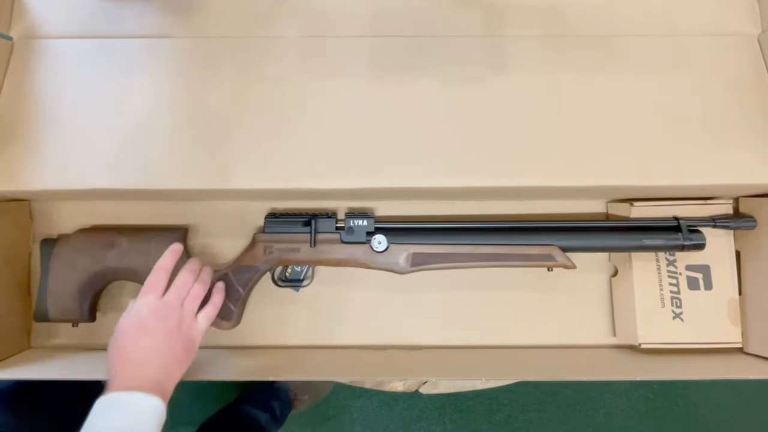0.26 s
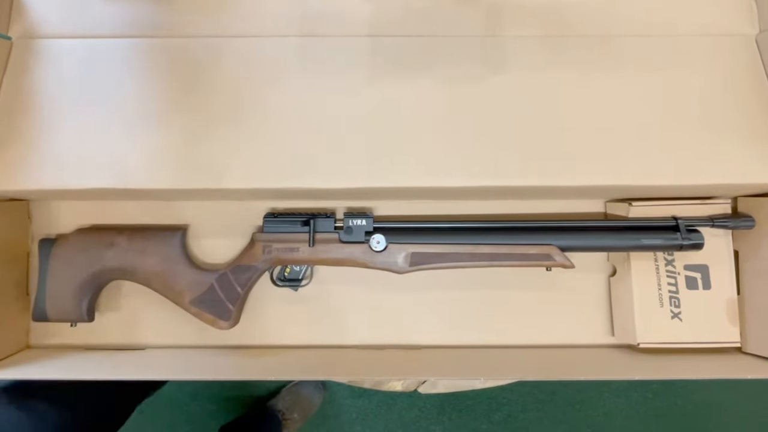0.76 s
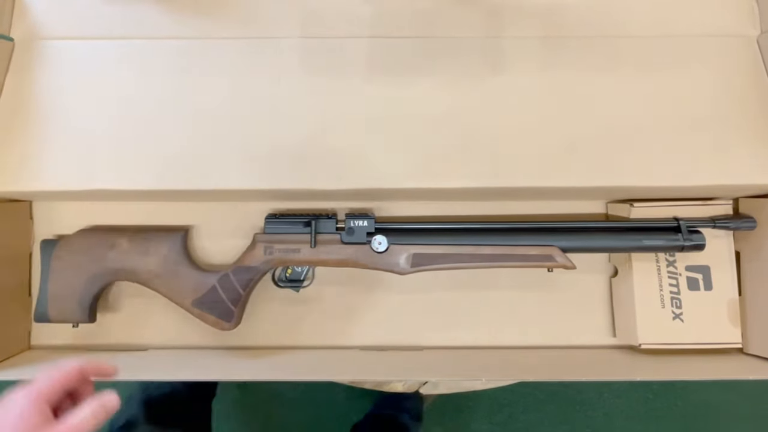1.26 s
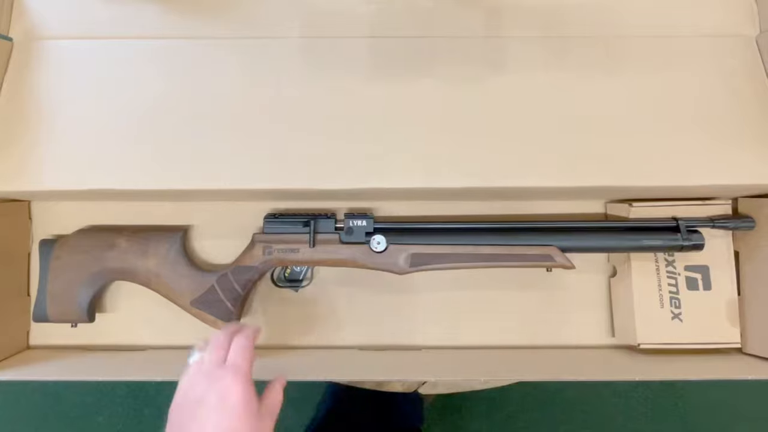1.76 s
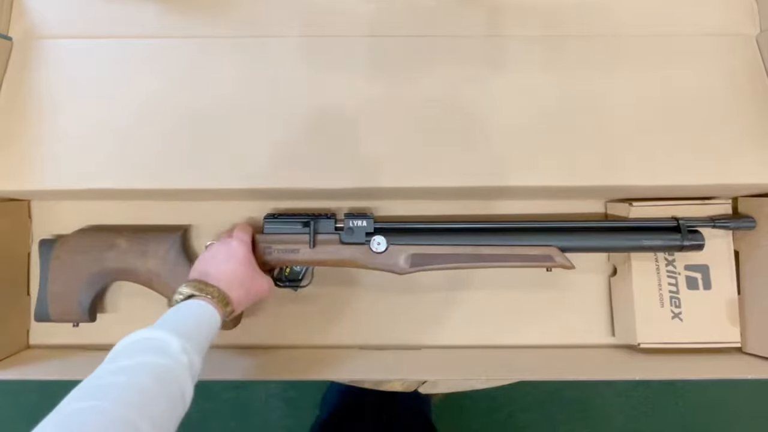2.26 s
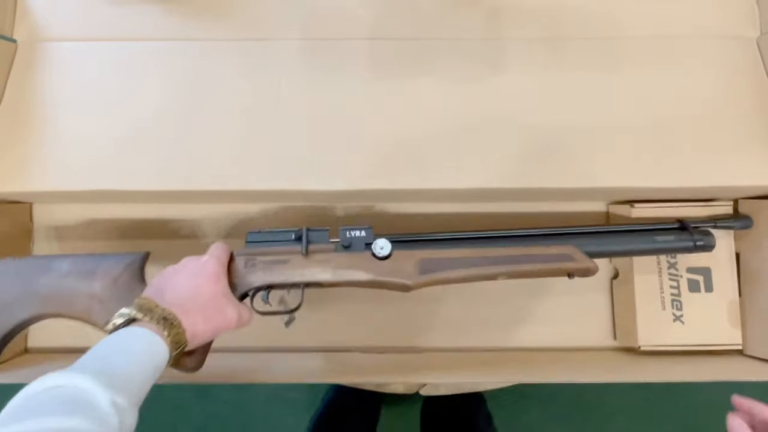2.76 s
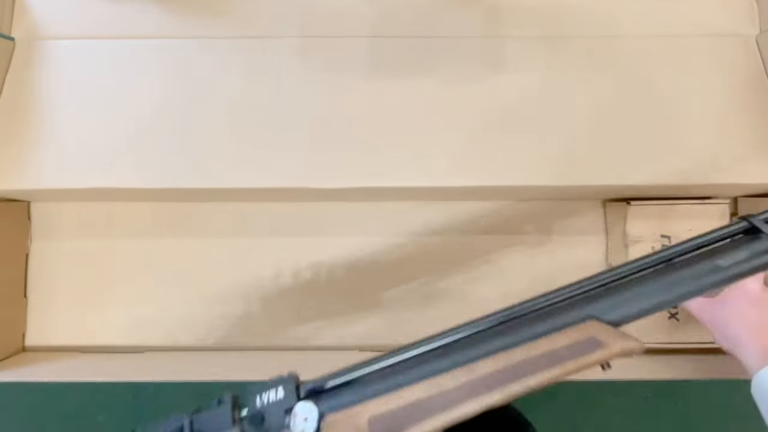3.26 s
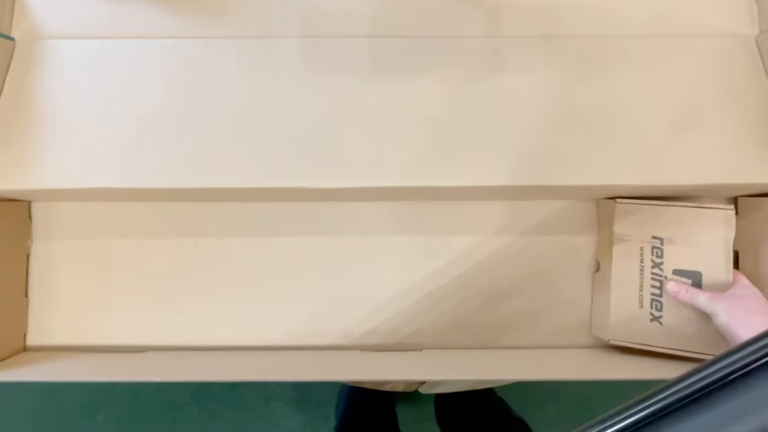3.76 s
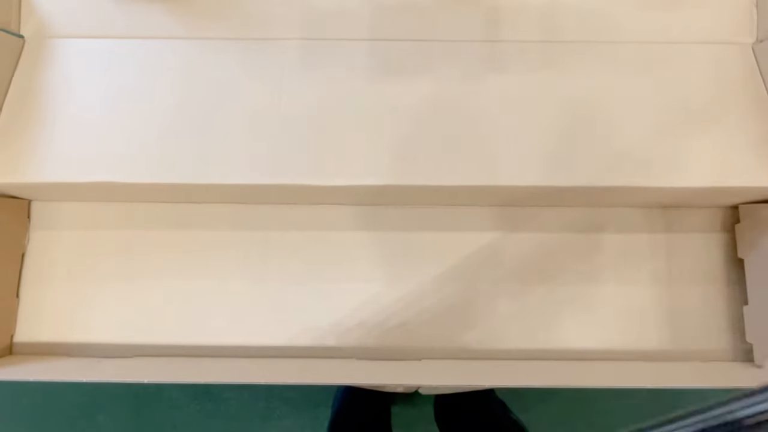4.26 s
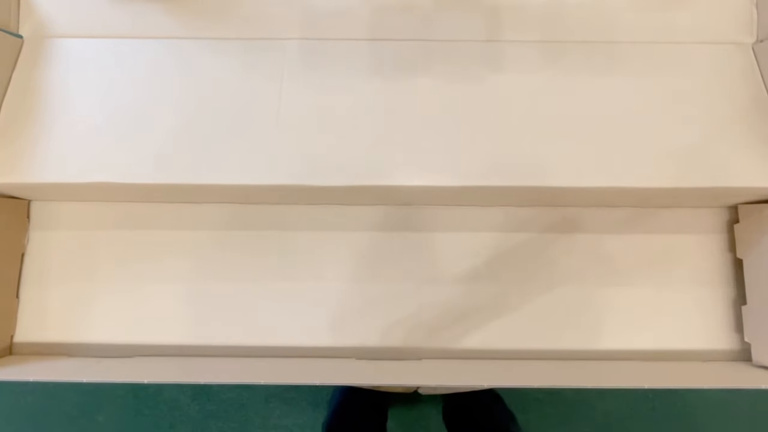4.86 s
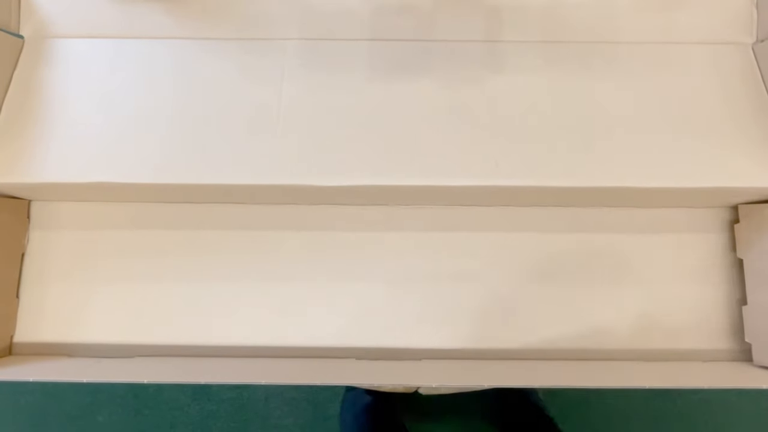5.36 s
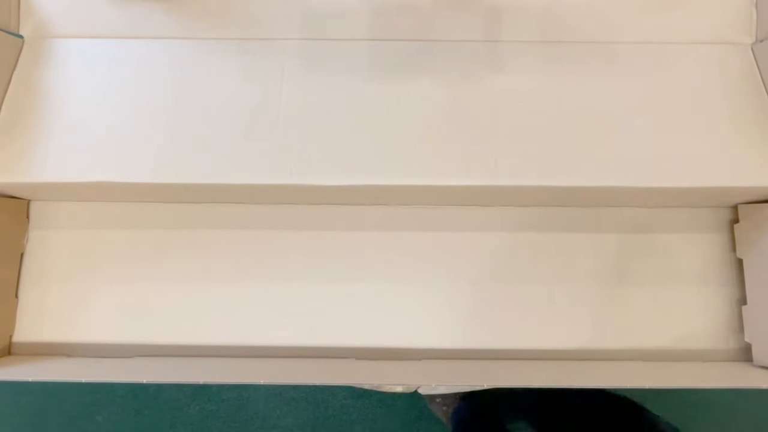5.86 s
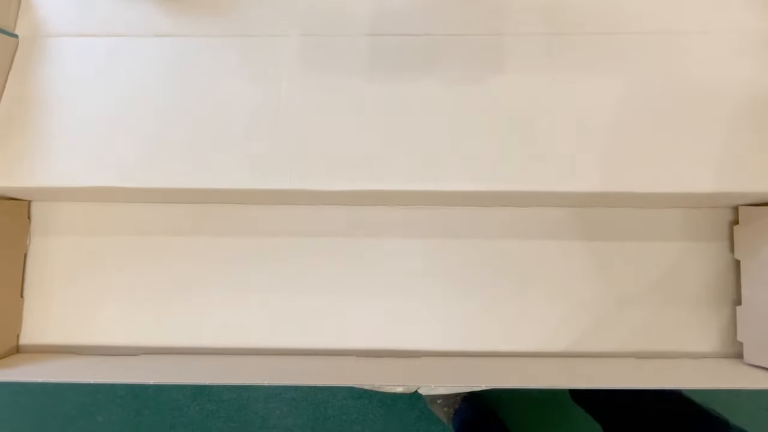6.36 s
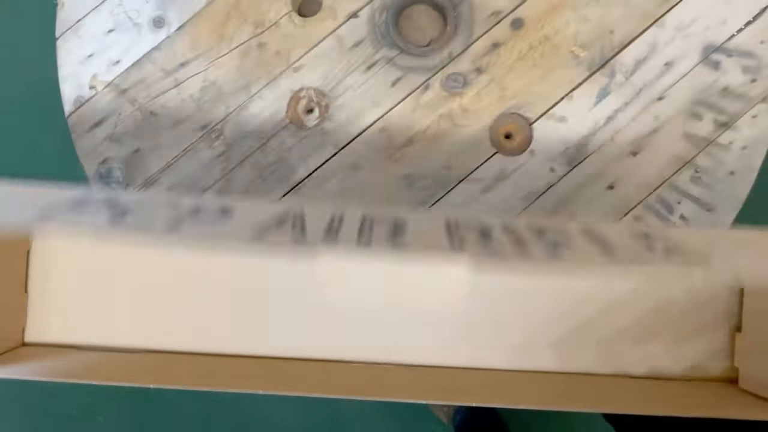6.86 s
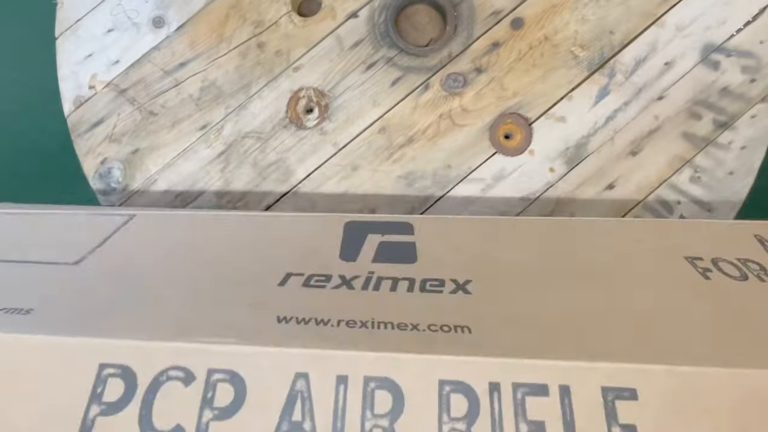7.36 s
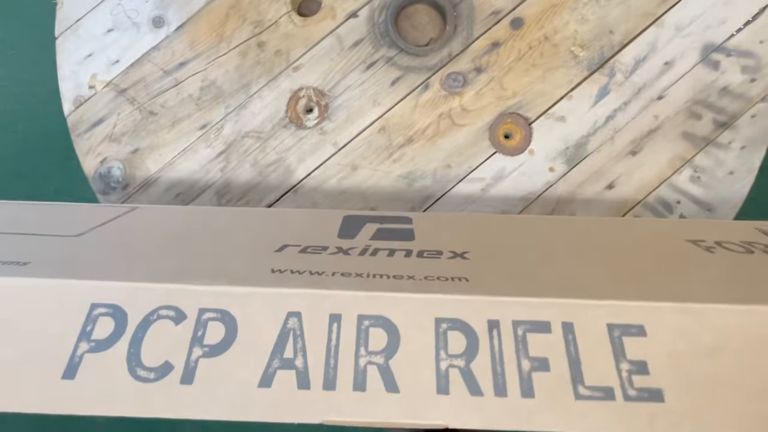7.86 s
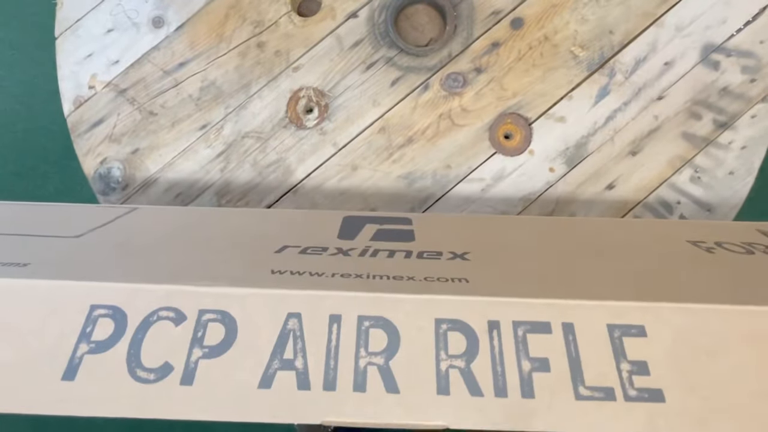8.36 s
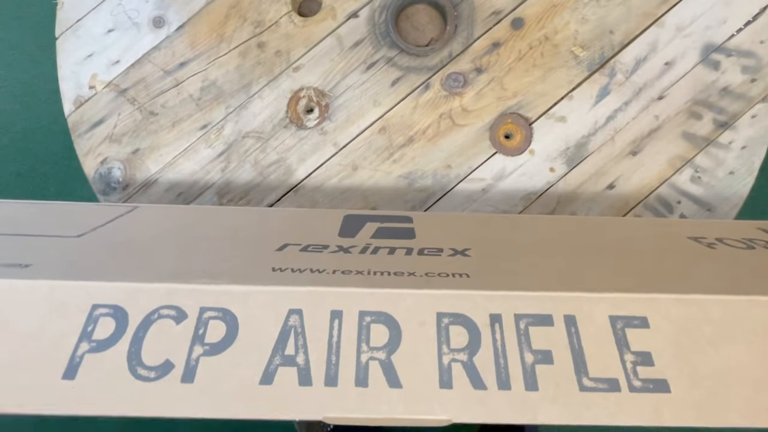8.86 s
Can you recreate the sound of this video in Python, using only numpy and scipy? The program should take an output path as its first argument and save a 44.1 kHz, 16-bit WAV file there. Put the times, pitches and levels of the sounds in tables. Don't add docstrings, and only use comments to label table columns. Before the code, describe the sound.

Hands handle a big cardboard box, heard near and dry with very short room reflections. Skin and edges hiss and scrape over board; blows give dull low-mid thunks and soft hollow booms. An opening scuff fades to quiet, then come lifting bumps, carton rubs with small ticks and a tiny metallic chink, one sharp tap, a pause, and heavy lid closing thumps with papery rustles.

```python
import sys
import numpy as np
from scipy import signal
from scipy.fft import rfft, irfft, next_fast_len
from scipy.io import wavfile
from scipy.ndimage import uniform_filter1d

SR = 44100
rng = np.random.default_rng(int(sys.argv[2]) if len(sys.argv) > 2 else 0)


def volts(x):
    e = np.asarray(x, float) / 20
    return 10 ** e


def file_out(sig):
    cols = np.atleast_2d(sig).T
    lim = np.clip(cols, -1, 1)
    pcm = np.round(lim * 32767).astype(np.int16)
    wavfile.write(sys.argv[1], SR, pcm)


N = 401751

# t/s, pitch of the touched spot f/Hz, left-right balance/dB
HAND_PATH = [(0.2, 377, -1.5), (0.33, 765.7, -3.5), (0.61, 707, -2), (1.09, 336.2, 3.5), (2.66, 365, -1),
             (2.89, 834.4, 0), (3.07, 353, 0), (3.86, 349.5, -1), (4.26, 836.1, 0), (4.69, 620, 1.5),
             (4.9, 338.3, 6.5), (5.07, 695.9, 4.5), (5.9, 437.2, 2.5), (6.5, 371.9, -1), (8.14, 388.2, 1),
             (8.28, 920, 7), (8.45, 293.9, 1), (8.95, 300.8, 1.5)]


def handling():
    # t of the peak/s, scrape level/dB, boom above scrape/dB, swell/s, fade/s per 20 dB
    push_table = [(0.0, -31, 5, .1, 0.0311), (0.12, -44.5, -0.5, 0.218, 0.0658), (0.2, -57, 4, 0.1258, .5),
                  (0.03, -41, -5, 0.0488, 0.0795), (0.512, -51, -14.5, 0.04903, -0.054),
                  (1.4, -75, 6, 0.4318, 0.9932), (2.2, -54.5, 4.5, 0.07575, 0.5976),
                  (2.35, -48.5, 0.5, 0.16435, 0.1797), (2.66, -69, 6, 0.477, -0.5532),
                  (3.3, -59.5, -17, 0.1143, 1.4946), (3.15, -59.5, -5.5, 0.02404, 2.3378),
                  (3.73, -50, 0.5, 0.4205, 0.5247), (4.15, -60, -7, 0.645, 0.4635),
                  (4.87, -65.5, -17, 0.365, 0.34), (5.0, -63, -1, 0.5044, -0.28),
                  (5.12, -53, -11.5, 0.03, 0.7642), (6.0, -65, 1.5, 0.3, 3.5),
                  (6.548, -46, 2, 0.24074, 0.2911), (7.0, -60.5, 18, 0.075, .5),
                  (7.18, -49.5, -12.5, 0.351, 0.3492), (7.609, -47.5, 6, 0.22701, 0.1758),
                  (8.05, -67.5, 8, 0.088, 0.2735), (7.88, -67.5, 7, 0.0511, 0.1204),
                  (7.96, -73, 16, 0.033, 0.0301), (2.02, -74.5, 16, 0.0308, 0.1976),
                  (8.42, -62, 1, .08, -0.0581), (6.8, -57.5, 2.5, 0.069, -0.0127),
                  (5.75, -61.5, -3.5, .1, 0.7061), (7.36, -62.5, 5.5, 0.23, 0.4684),
                  (8.5, -56, -2, 0.2985, 0.2942), (8.85, -47.5, 0.5, 0.04747, -1),
                  (9.0, -48.5, 4.5, 0.19, -1.7814)]
    # t of the peak/s, level/dB, swell/s, fade/s per 20 dB
    lift_rubs = [(0.0, -54.5, 0.035, 0.2904), (0.12, -51, 0.4744, 0.0753), (0.24, -48.5, 0.04188, .5),
                 (0.348, -50.5, 0.242, 0.2537), (0.509, -51.5, 0.0816, 0.2137),
                 (0.66, -64.5, 0.0658, 0.2244), (1.24, -69.5, 0.1059, 0.7204),
                 (2.17, -56.5, 0.0563, 0.2632), (2.328, -51.5, 0.06663, 0.1718),
                 (2.514, -60.5, 0.0217, 0.1324), (2.745, -65, 0.11, 0.06), (2.81, -66, 0.045, 0.17),
                 (3.141, -64.5, 0.01729, 0.5366), (3.29, -52, 0.0605, 0.1492),
                 (3.52, -64.5, 0.3437, 0.5318), (3.4, -64.5, 0.0405, 0.0023), (3.19, -64, 0.0326, -0.3421),
                 (3.627, -53.5, 0.08757, 0.1855), (3.729, -45, 0.04611, 0.1928),
                 (3.877, -48.5, 0.1176, 0.1453), (3.95, -62.5, 0.0232, 1), (4.045, -55, 0.1, 0.11)]
    carton_rubs = [(4.14, -55, 0.0864, 0.2284), (4.299, -51, 0.07934, 0.1433),
                   (4.492, -53.5, 0.02726, 0.0778), (4.669, -56, 0.07004, 0.02155),
                   (4.799, -52.5, 0.03934, 0.6683), (4.97, -48, 0.21225, 0.07944),
                   (5.149, -52.5, 0.16, 0.30224), (5.681, -61, 0.067036, 0.752)]
    lid_rubs = [(6.192, -59, 0.02407, 0.1442), (6.1, -62.5, 0.08876, 0.06235),
                (6.45, -49.5, 0.1195, 0.1628), (6.7, -58, 0.4594, 0.3453), (6.95, -57, 0.04063, 0.44855),
                (7.18, -62, 0.02433, 0.3085), (7.46, -58.5, 0.05603, 0.28), (7.64, -54.5, 0.2105, 0.17642),
                (8.05, -74, 0.0695, 0.51), (8.45, -58, 0.3293, 0.45), (8.83, -52.5, 0.0284, 0.16225),
                (8.96, -58.5, 0.03984, 0.3078)]
    # f/Hz, level/dB per Hz
    hiss_colour = [(410, -20.5), (700, 0), (1320, -4), (1960, -6.5), (3040, -8), (4280, -8.5), (5360, -9),
                   (15000, -7), (15900, -1), (16500, -40.5)]
    # f/Hz, width/Hz, level/dB
    panel_modes = [(262.84, 85.04, 6), (378.16, 34.5, 1.5), (467.39, 22.016, 2), (599.38, 79.32, 1),
                   (758.69, 144.85, -1.5), (1075, 303.77, -0.5), (1300, 830.5, -2.5)]
    # f/Hz, width/Hz, level/dB
    hollow_modes = [(45.879, 11, -4), (65.195, 14.22, -1.5), (90, 20.71, -3), (134, 16.4, -5.5),
                    (182.68, 34.54, -8)]
    # start t/s, end t/s, level/dB, f/Hz, width/Hz
    fingertip_strokes = [(1.205, 1.413, -72, 383.5, 496), (2.702, 2.893, -68, 824.6, 233.3),
                         (3.006, 3.064, -72, 2989, 5067), (3.129, 3.228, -59, 953.3, 298),
                         (3.545, 3.659, -62.5, 894.9, 279.9), (3.587, 3.636, -56, 5338, 1517),
                         (3.832, 3.946, -57.5, 711.1, 250), (4.06, 4.343, -62.5, 926.6, 455.5),
                         (4.473, 4.519, -57, 3573, 1300), (5.711, 5.87, -54, 658.5, 525.5),
                         (8.39, 8.556, -52, 198.5, 149.6)]
    # start t/s, end t/s, level/dB, first f/Hz, last f/Hz
    sliding_strokes = [(4.8374, 4.9896, -55, 5390, 6310), (5.286, 5.31, -67.5, 2034, 2252),
                       (6.552, 6.856, -73, 3992, 4249), (6.454, 7.113, -73, 6830, 6750),
                       (5.225, 5.32, -51.5, 699.9, 506.1), (5.17, 5.21, -47.5, 657.7, 620),
                       (0.2321, 0.407, -54.5, 5976, 5606), (0.4905, 0.53344, -61.5, 1827, 1671),
                       (0.5832, 0.75955, -65.5, 511.4, 405.1)]
    # start t/s, end t/s, first f/Hz, last f/Hz, width/Hz
    squeak_bands = [(1.985, 2.175, 2950, 2750, 900), (1.985, 2.175, 3450, 3300, 700),
                    (1.99, 2.17, 5550, 5500, 600), (2.68, 2.77, 2850, 3000, 350),
                    (2.79, 2.895, 2380, 2250, 200), (2.79, 2.87, 3400, 3200, 450),
                    (5.787, 5.835, 4450, 4550, 300), (5.785, 5.85, 5200, 5750, 450),
                    (6.075, 6.108, 4900, 4800, 1500), (7.425, 7.545, 3700, 3700, 2200),
                    (7.585, 7.70, 3600, 3500, 2400), (8.225, 8.32, 1000, 1200, 450),
                    (8.235, 8.33, 1500, 2450, 900), (2.155, 2.27, 1500, 1300, 1200),
                    (2.325, 2.46, 1400, 1100, 1200)]
    squeak_levels = [-71.5, -76, -82, -79, -79, -77, -69, -71, -64, -62.5, -61, -68, -68, -59, -57]
    # start t/s, end t/s, level/dB
    sizzle_table = [(0.09, 0.163, -54), (0.198, 0.42, -50), (0.441, 0.661, -63), (2.2, 2.38, -65.5),
                    (3.238, 3.36, -59.5), (3.7, 3.95, -58), (4.838, 4.94, -60.5), (6.55, 6.84, -57.5)]

    s, push_db, weight_db, swell_s, fade_s = np.transpose(push_table)
    scraping = gestures(s, push_db, swell_s, fade_s)
    drumming = gestures(s, push_db + weight_db + 1.5, swell_s, fade_s)
    sliding = gestures(*np.transpose([*lift_rubs, *carton_rubs, *lid_rubs]))
    spot_hz, pan_db = along(HAND_PATH)

    grains = slips(16000, 2.3, 0.016, 1.4575, clump_db=1.8397)
    rough = slips(2500, 3.45, 0.0573, 0.8496)
    hiss = patchy(coloured(grains, hiss_colour), 2.2) * volts(2.0) * sliding
    scrape = body(rough, panel_modes) + 0.2389 * resonate(rough, spot_hz, 305)
    boom = body(slips(400, 1.5, 0.013, 0.9951), hollow_modes) * drumming

    for start, end, db, hz, width in fingertip_strokes:
        add(hiss, start, stroke(grains, start, end, db, hz, hz, width, 0))
    for start, end, db, first_hz, last_hz in sliding_strokes:
        width = first_hz / 3.0086
        add(hiss, start, stroke(grains, start, end, db, first_hz, last_hz, width, 4.5))
    for (start, end, *band_hz), db in zip(squeak_bands, squeak_levels):
        add(hiss, start, stroke(grains, start, end, db, *band_hz, 4.0))
    for start, end, db in sizzle_table:
        add(boom, start, stroke(grains[[0, 0]], start, end, db, 15400, 15400, 500, 0))
    return (hiss + scrape * scraping) * sides(pan_db) + boom


def slips(per_s, spread_db, clump_s, apart, clump_db=2.5):
    size = volts(spread_db * np.minimum(rng.exponential(1, N), 3))
    size = size * (rng.random(N) < per_s / SR)
    clumps = rng.standard_normal(N)
    for _ in range(2):
        clumps = uniform_filter1d(clumps, int(clump_s * SR))
    clumps = volts(clump_db * np.clip(evened(clumps), -2, 1.5))
    shared, left, right = rng.standard_normal((3, N))
    return size * clumps * (shared + apart * np.array([left, right]))


def gestures(s, db, swell_s, fade_s):
    roundness = 1.249
    t = np.arange(0, N / SR + .01, .002)[:, None]
    away = np.maximum((s - t) / np.abs(swell_s), (t - s) / np.abs(fade_s))
    power = (volts(db - 20 * away ** roundness) ** 2).sum(1)
    return np.interp(np.arange(N) / SR, t[:, 0], np.sqrt(power))


def patchy(x, db):
    z = signal.stft(x, nperseg=512)[2]
    patches = rng.standard_normal(z.shape[1:])
    patches = uniform_filter1d(patches, size=5, axis=0)
    patches = uniform_filter1d(patches, size=14, axis=1)
    return evened(signal.istft(z * volts(db * evened(patches)), nperseg=512)[1][:, :N])


def body(drive, modes):
    shape = sum((-1) ** k * np.sqrt(w) * ring(hz, w, db) for k, (hz, w, db) in enumerate(modes))
    return evened(signal.oaconvolve(drive, shape[None], axes=1)[:, :N])


def stroke(grains, start, end, db, first_hz, last_hz, width, gain_db):
    first = round(start * SR)
    t = np.arange(0, end - start, 1 / SR)[:N - first]
    gone = t / (end - start)
    pressed = np.clip(np.minimum(t, end - start - t) / 0.022635, 0, 1) * volts(db + gain_db * (gone - 1.5))
    hz = first_hz + (last_hz - first_hz) * gone
    return pressed * resonate(grains[:, first:][:, :len(t)], hz, width)


def knocks():
    # t/s, peak level/dB, panel f/Hz, crack level/dB
    lift_knocks = [(0.034, -27.5, 267.5, -48.5), (0.058, -26, 596.8, -36), (0.099, -79.5, 600.6, -49.5),
                   (1.999, -49.5, 250.6, -79.5), (2.16, -31, 208.3, -40.5), (2.295, -33.5, 928.6, -36),
                   (2.338, -19.5, 273.4, -39), (2.393, -31, 737.8, -39.5), (2.427, -33.5, 715.6, -43),
                   (2.513, -53, 344.6, -49.5), (2.789, -46, 710.4, -62), (3.131, -45.5, 341.3, -50),
                   (3.166, -39.5, 293.8, -41), (3.191, -37, 328.3, -45), (3.273, -32.5, 674.8, -37),
                   (3.399, -27.5, 331.6, -38.5), (3.488, -38, 323, -47.5), (3.554, -36, 766.6, -50.5),
                   (3.676, -26, 327.9, -39), (3.719, -23, 364.5, -34), (3.74, -25, 226.1, -36),
                   (3.767, -48.5, 220, -47)]
    carton_knocks = [(4.281, -27.5, 868.6, -55.5), (4.313, -26, 839.5, -51), (4.485, -47, 390.7, -44),
                     (4.793, -39, 960, -46), (4.869, -32.5, 766.4, -39.5), (4.905, -24, 241.7, -37),
                     (4.979, -33, 538.8, -51.5), (5.021, -33.5, 499.5, -39), (5.044, -31, 1051, -56.5),
                     (5.118, -36.5, 798, -56), (5.138, -36.5, 666.8, -35), (5.327, -35, 520.2, -39.5),
                     (5.57, -46, 509.3, -53.5), (5.726, -53, 774.3, -47)]
    lid_knocks = [(6.181, -38, 449.6, -42.5), (6.202, -56, 193.6, -41.5), (6.349, -41.5, 735, -65.5),
                  (6.416, -23, 269.4, -44.5), (6.447, -22.5, 418.6, -31.5), (6.499, -28, 339, -40),
                  (6.949, -24.5, 209.6, -35), (7.026, -15.5, 190.4, -40.5), (7.135, -39, 355.1, -46.5),
                  (7.31, -31, 228.2, -54.5), (7.434, -34, 655.6, -51), (7.544, -16.5, 205.9, -30.5),
                  (8.354, -38, 681.8, -51), (8.803, -42.5, 300, -50.5), (8.825, -27.5, 671.8, -41),
                  (8.842, -22, 333.8, -36), (8.876, -22.5, 186.2, -37.5), (8.958, -20.5, 256, -26.5),
                  (8.992, -22.5, 290.2, -32.5)]
    # f/Hz, level/dB
    crack_modes = [(360, -0.5), (480, 2.5), (650, 5), (850, 4.5), (1100, 3.5), (1450, 1.5), (1900, 2)]
    # t/s, peak level/dB, f/Hz
    boom_table = [(0.0, -25, 113.1), (0.057, -26, 88.62), (2.17, -33, 138.6), (2.343, -27.5, 125.4),
                  (2.383, -32, 63.52), (3.731, -28.5, 185.7), (4.005, -36, 84.54), (6.002, -40.5, 62.19),
                  (6.207, -28.5, 96.5), (6.402, -28, 137.4), (6.456, -22, 90), (6.548, -34, 74.51),
                  (6.795, -38.5, 92.7), (6.84, -41, 90), (6.235, -37.5, 94.63), (6.954, -31, 134),
                  (7.027, -29, 162.2), (7.31, -40.5, 125.8), (7.527, -35, 72.99), (7.548, -24, 162.7),
                  (7.711, -28.5, 74.91), (7.774, -39.5, 69.89), (3.13, -49.5, 155.4), (8.006, -42.5, 62.88),
                  (8.845, -29, 78.36), (8.89, -35, 125.3)]

    out, t = np.zeros((2, N)), np.arange(SR // 4) / SR
    blows = [*lift_knocks, *carton_knocks, *lid_knocks]
    chance = rng.uniform(-1.1, 1, (len(blows), 10))
    _, pan_db = along(HAND_PATH)
    for (s, db, hz, crack_db), c in zip(blows, chance):
        turns = hz * (t + 0.00088777 * (1 - np.exp(-t / 0.0009842)))
        struck = volts(db + 3.0) * np.sin(2 * np.pi * turns) * np.exp(-np.pi * (55 + 0.07962 * hz) * t)
        near = sum(ring(hz * (ratio + 0.17715 * j), 70 + 0.08764 * hz * ratio, db + d)
                   for ratio, d, j in zip((1.6, 2.4), (-4, -7), c))
        panel = (struck + near) * swell(t, 0.447 / hz + 0.004383)
        crack = sum(np.sign(j) * ring(f * (1 + 0.08995 * j), 0.19287 * f, crack_db + d)
                    for (f, d), j in zip(crack_modes, c[3:]))
        panel += crack * swell(t, 0.0030724)
        bounce_s = .016 + 0.0054245 * c[2]
        panel += 0.2106 * np.roll(panel, int(bounce_s * SR))
        grit = np.diff(rng.standard_normal((2, len(t))), prepend=0)
        grit = volts(crack_db - 48.5) * grit * np.exp(-t / 0.0059)
        add(out, s + 0.00097415, placed(panel + grit, pan_db[int(s * SR)]))
    for s, db, hz in boom_table:
        boom = ring(hz, 22.824, db + 3.5) + ring(1.5408 * hz, 25.444, db - 4.5)
        boom = boom * swell(t, 0.545 / hz + 0.00295) * swell(t[::-1], .05)
        add(out, s, np.ones((2, 1)) * boom)
    return out


def ticks():
    # t/s, peak level/dB, f/Hz
    edge_table = [(2.162, -37, 1740), (2.301, -37, 1788), (2.3342, -32.5, 1796), (3.5207, -38.5, 1848),
                  (3.703, -41, 3796), (3.721, -31, 1828), (4.285, -36, 2835), (4.3147, -30, 2953),
                  (4.4856, -46, 3871), (4.796, -26.5, 3968), (4.9601, -40.5, 4827), (5.033, -33.5, 1952),
                  (5.1359, -29.5, 1604), (6.1892, -34, 1386), (6.4218, -37, 4659), (6.4461, -27.5, 1831),
                  (6.4947, -31, 4406), (7.1695, -40, 2524), (7.543, -38, 1744), (8.32, -34, 1544),
                  (8.358, -31, 2762), (8.8244, -39, 2892), (8.8422, -34.5, 1707), (8.9469, -41.5, 1744)]
    # t/s, level/dB, f/Hz, t60/s
    chink_table = [
        (4.957, -47.5, 4646, 0.1336),
        (4.96, -47.5, 4913, 0.1422),
    ]

    out, t = np.zeros((2, N)), np.arange(2000) / SR
    for s, db, hz in edge_table:
        grit = rng.standard_normal((2, len(t)))
        grit = .35 * grit + resonate(grit, hz + 0 * t, 1.2 * hz + 1500)
        grit = volts(db - 6.5) * grit * np.exp(-t / 0.0042) * swell(t, .0022)
        crack = ring(hz, 330, db - 2.5)[:len(t)] * swell(t, .0009)
        add(out, s - .001, crack + grit)
    for s, db, hz, t60 in chink_table:
        add(out, s, sides(3.0)[:, None] * ring(hz, 2.2 / t60, db))
    return out


def taps():
    # t/s, peak level/dB, f/Hz, damping/Hz, left-right balance/dB
    board_taps = [(5.1374, -9.5, 683.77, 250.93, 8.5), (5.143, -25.5, 333.57, 141.29, 4.5),
                  (5.152, -29, 680.48, 133.3, 5.5), (5.158, -31.5, 1507.3, 250, 7),
                  (4.775, -44.5, 1066, 247.8, 4), (4.868, -31, 903.5, 245.7, 6.5),
                  (4.897, -41.5, 760.6, 213, 6), (4.948, -38.5, 544.3, 147, 1),
                  (4.96, -34.5, 1990.7, 250, 9), (5.005, -41.5, 697.2, 180, 5.5),
                  (2.783, -51, 3285, 700, 0.5), (2.792, -47, 3900, 800, 0.5), (2.747, -50, 2984, 500, 0.5),
                  (3.017, -52, 4000, 800, 0.5), (3.038, -54, 1100, 280, 0.5), (3.015, -60, 1166, 283.7, 0),
                  (6.108, -44, 1292.6, 300, 7.5), (6.457, -25, 474.48, 136.6, -0.5),
                  (6.203, -45, 1310.3, 261.5, 2), (3.745, -32.5, 1752.7, 310.7, -1),
                  (3.77, -35, 1367, 245, -1), (2.175, -36.5, 559.6, 106.33, -2), (3.707, -36, 370, 40, -1),
                  (3.7245, -25, 350, 70, -1), (3.729, -23, 380, 140, -1), (3.7275, -29, 1000, 220, -1),
                  (3.738, -30, 1900, 350, -1), (4.91, -37, 1205, 241.2, 6.5),
                  (6.136, -58, 3500, 829, 8), (6.873, -46, 1244, 289, 3), (7.745, -55.5, 1578, 298.3, 0),
                (7.873, -55, 1319, 302, -0.5), (8.03, -55, 1303.6, 322.7, 2.5),
                (8.183, -56.5, 583.5, 262.6, -0.5), (8.318, -37, 2300, 450, 3), (8.341, -50, 2100, 500, 3),
                (7.598, -42, 3200, 800, 0.5), (7.616, -40, 2600, 700, 0.5), (7.661, -38, 3100, 700, 0.5),
                (6.09, -47, 4800, 800, 3), (6.135, -52, 700, 250, 3), (7.384, -46, 600, 220, 0.5),
                (5.327, -42, 1500, 350, 4), (7.436, -42, 850, 250, 0.5)]

    out, t = np.zeros((2, N)), np.arange(2000) / SR
    for s, db, hz, width, pan_db in board_taps:
        tap = ring(hz, width, db + 5) + ring(2.0804 * hz, 1.354 * width, db - 2)
        tap = tap[:len(t)] * swell(t, min(0.002239, .55 / width))
        add(out, s, placed(tap, pan_db))
    return out


def snaps():
    # t/s, peak level/dB
    snap_table = [(3.361, -62), (3.677, -60), (6.1795, -63), (6.1909, -61.5), (6.3718, -61.5),
                  (7.1436, -68), (7.5497, -62), (8.343, -64), (8.822, -62), (0.125, -58.5), (0.14, -62),
                  (2.17, -62.5), (2.35, -64), (7.745, -65.5), (1.1, -77.5), (3.52, -66), (7.244, -69),
                  (7.31, -72)]

    out, t = np.zeros((2, N)), np.arange(400) / SR
    for s, db in snap_table:
        click = np.diff(rng.standard_normal(len(t) + 1), n=2) * np.exp(-t[1:] / 0.0014)
        add(out, s, np.ones((2, 1)) * volts(db + 23) * click)
    return out


def swell(t, rise):
    return np.sin(np.pi / 2 * np.clip(t / rise, 0, 1)) ** 2


def ring(hz, width, db, seconds=.25):
    t = np.arange(int(seconds * SR)) / SR
    return volts(db) * np.exp(-np.pi * abs(width) * t) * np.sin(2 * np.pi * hz * t)


def resonate(x, hz, width):
    turn = np.exp(2j * np.pi * np.cumsum(hz) / SR)
    r = np.exp(-np.pi * width / SR)
    smooth = signal.lfilter([1], np.convolve([1, -r], [1, -r]), x / turn)
    return evened((turn * smooth).real)


def sides(db):
    return volts(np.array([db / 2, -db / 2]))


def placed(sound, pan_db):
    lag = round(.000033 * pan_db * SR)
    left, right = sides(pan_db)[:, None] * sound
    left = np.pad(left, (max(-lag, 0), max(lag, 0)))
    right = np.pad(right, (max(lag, 0), max(-lag, 0)))
    return np.array([left, right])


def add(mix, s, sound):
    part = mix[:, max(round(s * SR), 0):][:, :sound.shape[1]]
    part += sound[:, :part.shape[1]]


def along(rows):
    s, *columns = np.transpose(rows)
    return (np.interp(np.arange(N) / SR, s, c) for c in columns)


def evened(x):
    return x / np.sqrt(np.mean(x ** 2) + 1e-20)


def read(points, hz):
    f, value = np.transpose(points)
    return np.interp(np.log(hz + 1), np.log(f + 1), value)


def coloured(x, points):
    size = next_fast_len(N + SR)
    gain = volts(read(points, np.fft.rfftfreq(size, 1 / SR)))
    return irfft(rfft(x, size) * gain, size)[..., :N]


def echoes(x):
    # f/Hz, t60/s
    room_decay = [(100, 0.28), (500, 0.17113), (2000, 0.08182), (8000, 0.03643)]

    pulses = np.zeros((2, SR // 2))
    slots = np.arange(150, SR // 2 - 20, 20)
    at = slots + rng.integers(0, 20, (2, len(slots)))
    np.put_along_axis(pulses, at, rng.choice([-1., 1.], at.shape), 1)
    hz, t, z = signal.stft(pulses, SR, nperseg=256)
    z = z * (hz > hz[1])[:, None]
    t60 = np.maximum(read(room_decay, hz), .03)[:, None]
    tail = signal.istft(z * volts(-60 * t / t60), SR, nperseg=256)[1]
    return signal.fftconvolve(x, tail / np.linalg.norm(tail[0]), axes=1)[:, :N]


def room_tone():
    # f/Hz, level/dB per Hz
    air_colour = [(15, -35.5), (25, -7), (60, -1), (344, -10), (438, -21.5), (501, -12), (573, -35),
                  (6200, -26), (15000, -53.5)]

    shared, left, right = rng.standard_normal((3, N))
    air = shared + 4.1 * np.array([left, right])
    return volts(-74) * evened(coloured(air, air_colour))


def scene():
    rubbing = handling() + taps()
    blows = knocks() + ticks()
    room = echoes(volts(-7.5) * blows + volts(-12) * rubbing)
    return rubbing + blows + snaps() + room + room_tone()


def top_cut(x):
    return signal.sosfilt(signal.butter(12, 17080, fs=SR, output="sos"), x)


def record(dry):
    # f/Hz, level/dB
    sum_curve = [(22, -17.5), (45, 2.5), (3000, 5), (6000, 2), (8000, -5.5), (9700, -24), (14400, -31),
                 (15300, -18), (16000, -25)]
    # f/Hz, level/dB
    difference_curve = [(30, -5), (120, -2.5), (300, -4.5), (700, 5.5), (3000, 6), (9000, 1.5),
                        (16000, -14.5)]

    total = coloured((dry[0] + dry[1]) / 2, sum_curve)
    difference = coloured((dry[0] - dry[1]) / 2, difference_curve)
    return top_cut(np.array([total + difference, total - difference]))


dry = scene()
out = record(dry)
file_out(out)
```